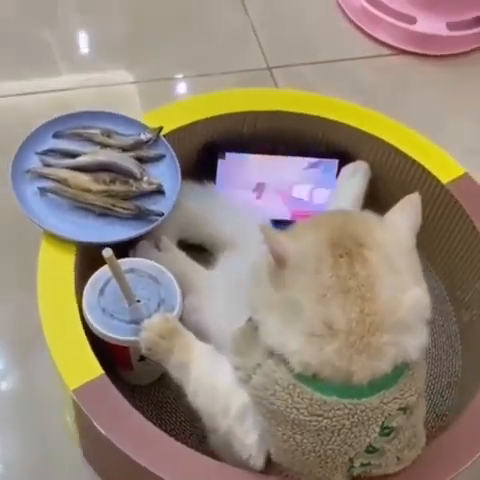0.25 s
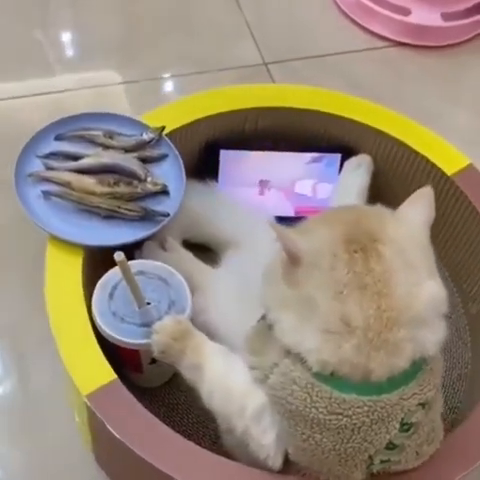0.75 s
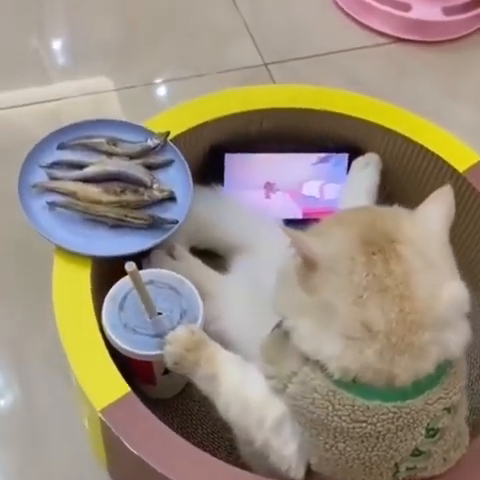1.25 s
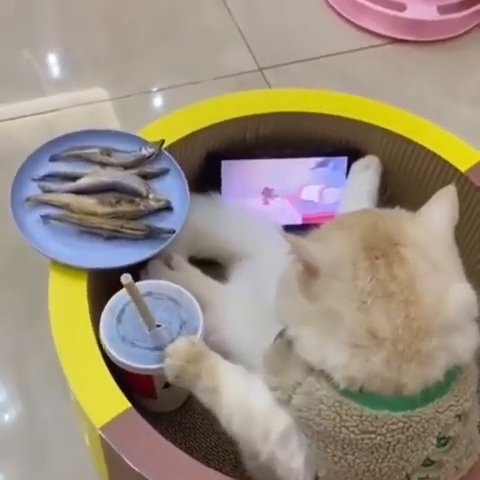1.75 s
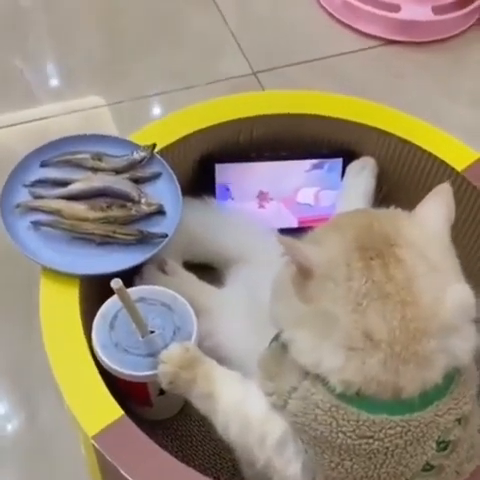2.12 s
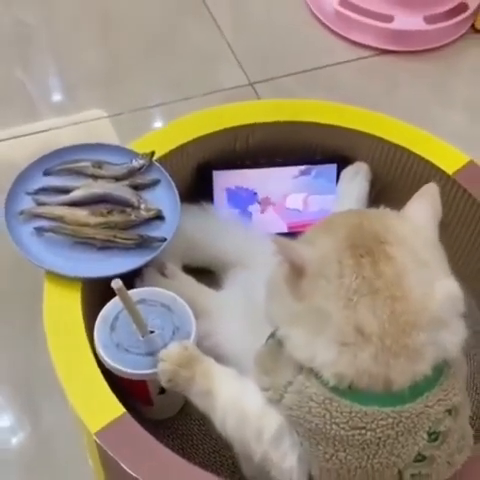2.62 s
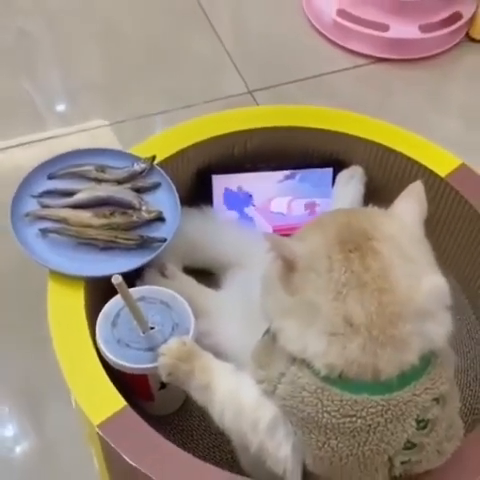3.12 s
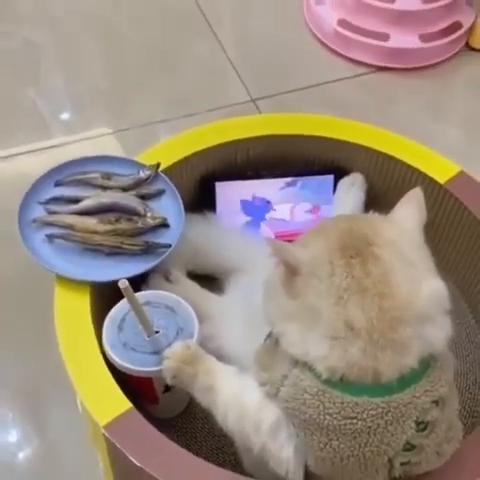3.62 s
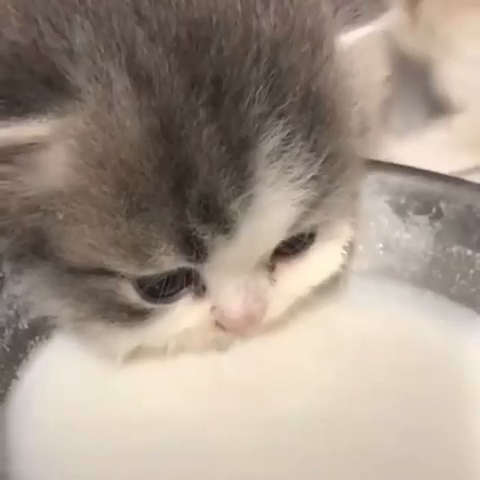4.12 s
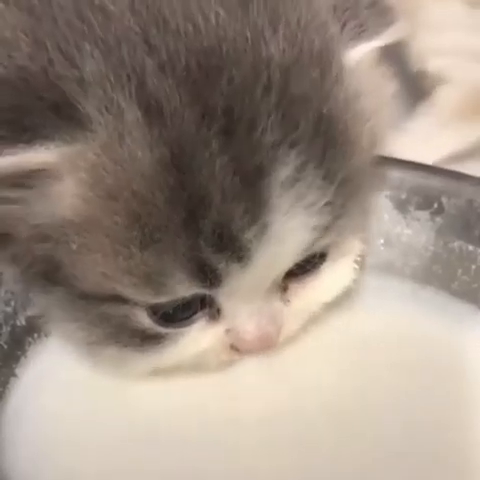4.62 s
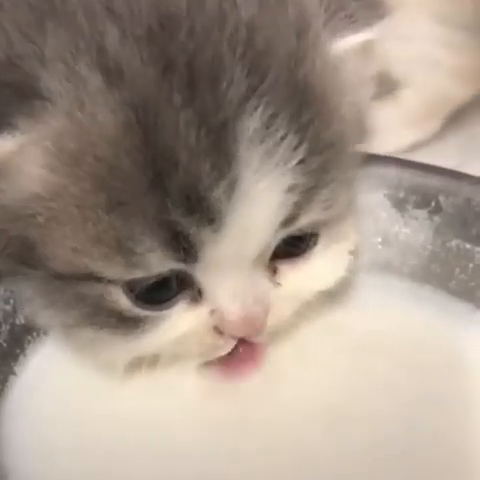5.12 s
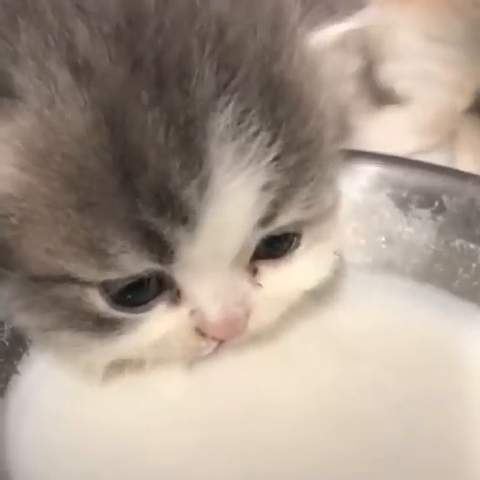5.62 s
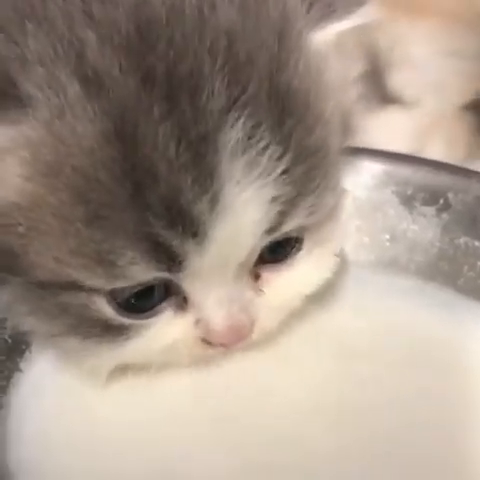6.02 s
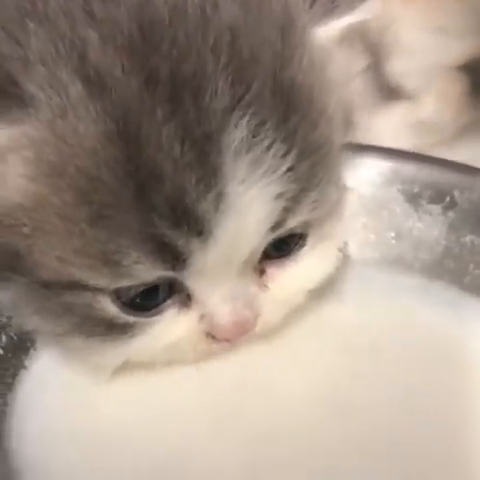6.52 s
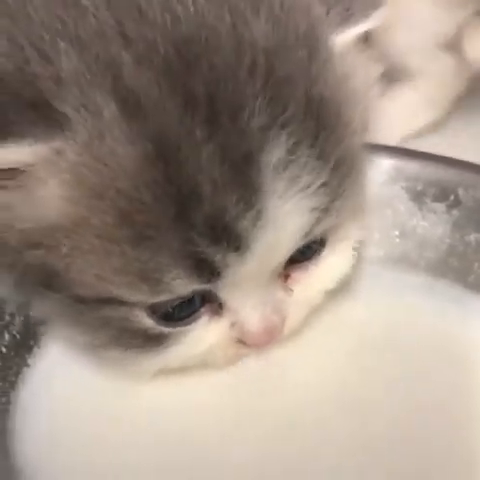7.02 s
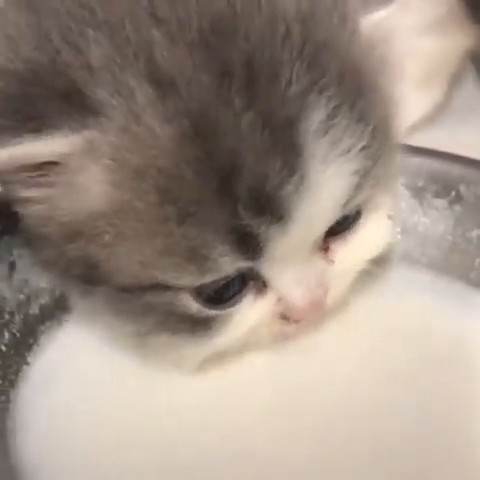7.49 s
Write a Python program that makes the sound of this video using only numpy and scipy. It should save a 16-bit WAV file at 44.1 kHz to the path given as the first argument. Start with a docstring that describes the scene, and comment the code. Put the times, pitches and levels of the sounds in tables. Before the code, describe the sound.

Near-silence with soft rustling for about five seconds, then loud, close, fast lapping of milk: sticky clicks, little gulps and bubbly chirps.

```python
"""Kitten lapping milk

Faint rustles in a quiet room; then, after a very short silence, a kitten laps milk close by from a metal bowl.
Each tongue stroke layers a wet crackle of tiny bubbles, gliding gulps, a run of snapping films and a low noise push.
Single pops stand out, longer bubbles chirp or linger, round plops ring at one pitch and the lips smack in noise.
Filtered noise and wavering sines make the rumble, hums and thin hiss below; one slurp of noise runs across the laps.
The quiet room is faint coloured noise and a far hum, with grainy bursts for the rustles and one dull bump."""
import sys
import numpy as np
from scipy import signal
from scipy.fft import rfft, irfft, next_fast_len
from scipy.io import wavfile
from scipy.ndimage import uniform_filter1d, minimum_filter1d

SR = 44100
rng = np.random.default_rng(int(sys.argv[2]) if len(sys.argv) > 2 else 0)


def dump(signal):
    """Clip the signal to [-1, 1] and save it as 16-bit WAV at the path in sys.argv[1]."""
    limited = np.clip(np.atleast_2d(signal).T, -1, 1)
    pcm = np.round(limited * 32767).astype(np.int16)
    wavfile.write(sys.argv[1], SR, pcm)


N = 341775
TIME = np.arange(N) / SR  # seconds


# Tongue strokes, shared by every layer of a lap.
# Each row: start in seconds, end in seconds, relative crackle level in dB, relative gulp level in dB.
STROKES = [(5.185, 5.206, -18.5, -28), (5.486, 5.503, -31, -33), (5.533, 5.547, -18.5, -31.5),
           (5.64, 5.656, -15, -19.5), (5.697, 5.716, -13.5, -22.5), (5.849, 5.862, -18, -31),
           (5.902, 5.94, -26.5, -36), (6.052, 6.062, -33, -24.5), (6.131, 6.163, -26, -29.5),
           (6.295, 6.318, -22, -29.5), (6.344, 6.388, -15, -31.5), (6.514, 6.562, -18.5, -33.5),
           (6.662, 6.694, -17.5, -30.5), (6.725, 6.746, -24, -20), (6.751, 6.785, -14.5, -31),
           (6.879, 6.921, -14.5, -17.5), (6.941, 6.976, -16, -23.5), (6.981, 7.021, -17.5, -38.5),
           (7.102, 7.14, -14.5, -18.5), (7.185, 7.235, -19.5, -23.5), (7.353, 7.39, -16, -19),
           (7.421, 7.452, -14.5, -30), (7.472, 7.505, -21, -36.5), (7.601, 7.656, -19.5, -27.5),
           (7.668, 7.747, -22.5, -39)]
# Colour of the crackle. Each row: frequency in Hz, relative density in dB.
CRACKLE_COLOUR = [(950, -16.5), (1250, -8.5), (2050, -5), (2850, -11.5), (3800, -2), (4700, -17.5),
                  (6500, -15)]


def crackle(release_s=0.004, fine_db=-6):
    """Tiny bubbles burst all along each stroke."""
    out = np.zeros(N)
    for start, end, wet_db, _ in STROKES:
        duration = end - start
        t = np.arange(0, duration + 10 * release_s, 1 / SR)
        attack = 1 - np.exp(-2 * t / release_s)
        fade = np.exp(-np.maximum(t - duration + release_s / 2, 0) / release_s)
        bursts = grains(len(t), per_s=1200, low_hz=1052, high_hz=6760, cycles=5.5, spread_db=10.5)
        fizz = unit(colour(bursts, CRACKLE_COLOUR))
        add(out, start, amp(wet_db + fine_db) * attack * fade * fizz)
    return out


def films(gap_s=0.0052, over_crackle_db=2, spread_db=5.5, spread_octaves=0.22,
          closing_octaves=0.21, cycles=2.9, arch_db=5):
    """The tongue peels off the milk in an uneven run of breaking films; each rings the closing mouth."""
    out = np.zeros(N)
    chances = rng.uniform(-1.003, 1, size=(len(STROKES), 30, 5))
    for (start, end, wet_db, gulp_db), run in zip(STROKES, chances):
        for k, (late, size, pitch, phase, bend) in enumerate(run):
            s = start + gap_s * (k + 0.5 + late / 2)
            if s < end:
                progress = (s - start) / (end - start)
                pull_db = arch_db * np.sin(np.pi * progress)  # the tongue pulls hardest in mid-stroke
                octaves = closing_octaves * (progress - 0.5) + spread_octaves * pitch
                hz = mouth_hz(wet_db, gulp_db) * 2 ** octaves
                db = wet_db + pull_db + over_crackle_db + spread_db * size
                add(out, *pop(s, db, hz, phase, bend, cycles))
    return out


def mouth_hz(wet_db, gulp_db, equal_hz=1542, octaves_per_db=0.022):
    """The deeper the tongue dips, the hollower the stroke: a louder gulp against the crackle lowers the pitch."""
    return equal_hz * 2 ** (octaves_per_db * (wet_db - gulp_db))


def gulps(hz=640, octaves=0.54, cycles=3.5, sag=0.08, gap_s=0.005, over_db=5.8):
    """The hollow under the tongue rings in low, falling glugs, deeper as the tongue lifts."""
    out = np.zeros(N)
    chances = rng.uniform(-1, 1, size=(len(STROKES), 30, 3))
    for (start, end, _, gulp_db), run in zip(STROKES, chances):
        for s, (late, pitch, phase) in zip(np.arange(start + gap_s, end, gap_s), run):
            lift = (s - start) / (end - start) - 0.5
            glug = blip(hz * 2 ** (octaves * (pitch - lift)), cycles, -sag, phase)
            add(out, *centred(s + late * gap_s / 2, amp(gulp_db + over_db) * glug))
    return out


# Single pops of milk that stand out. Each row: time in seconds, level in dB, pitch in Hz.
POPS = [(5.2434, -3.5, 1820), (5.2694, -7.5, 1750), (5.527, -11, 1450), (5.5348, -4, 3310),
        (5.6419, 1.5, 1490), (5.703, 2, 1900), (5.706, 0, 1557), (5.759, -5.5, 1800), (5.8309, -4, 1500),
        (5.852, -4.5, 1580), (5.8634, -10, 1530), (5.9326, -6.5, 1610), (6.0007, -16, 1660),
        (6.132, -7, 1950), (6.255, -6.5, 1950), (6.3314, -1.5, 2130), (6.3712, 2, 2050), (6.383, -4, 1437),
        (6.5303, -3, 1664), (6.5512, -3, 1570), (6.6697, -7, 1760), (6.7332, -3, 1555), (6.7489, 3, 2050),
        (6.763, 1, 1740), (6.817, -11.5, 1890), (6.88, -4, 1310), (6.904, -4.5, 1420), (6.947, -5.5, 1510),
        (7.108, -3.5, 1700), (7.1243, -0.5, 1630), (7.1945, -2, 1650), (7.2042, 0, 1510),
        (7.219, -0.5, 2000), (7.374, -2.5, 1285), (7.429, -4.5, 2120), (7.437, -1, 1720), (7.474, 4, 1600),
        (7.6823, -2.5, 3370), (7.693, 1.5, 3210)]


def pops(cycles=2.55, shred_db=-13, shred_s=0.006, shred_octaves=0.33):
    """Each single film tears with three weaker shreds scattered just before and after it."""
    out = np.zeros(N)
    chances = rng.uniform(-1, 1, size=(len(POPS), 4, 4))
    for (s, db, hz), (main, *shreds) in zip(POPS, chances):
        add(out, *pop(s, db, hz, *main[:2], cycles))
        for late, pitch, phase, bend in shreds:
            shred_hz = hz * 2 ** (shred_octaves * pitch)
            add(out, *pop(s + shred_s * late, db + shred_db, shred_hz, phase, bend, cycles))
    return out


def pop(s, db, hz, phase, bend, cycles, glide=0.1, overtone_db=-17, overtone_hz=3550):
    """A film snaps in a few cycles centred at s and touches the upper mouth resonance; gives (start, sound)."""
    life = cycles * (1 + bend ** 2 / 2)  # the longer pops glide further
    body = blip(hz, life, glide * bend, phase)
    overtone = amp(overtone_db) * blip(overtone_hz, life * overtone_hz / hz, glide * bend, bend)
    return centred(s, amp(db) * (body + overtone))


# Bubbles that ring on. Each row: start in seconds, level in dB, first pitch in Hz, last pitch in Hz.
BUBBLES = [(5.1874, -3, 1960, 2087), (5.188, -8, 4060, 4190), (5.537, -6.5, 2073, 1845),
           (6.14, -0.5, 2400, 2620), (6.1585, -8, 2500, 4000), (6.959, -3.5, 2066, 1630),
           (6.992, -3, 1900, 1520), (7.446, -7, 2390, 1945), (7.64, -5, 1642, 1560),
           (7.7019, -4, 2956, 3300), (7.733, -7, 1815, 1484)]


def bubbles(cycles=17.5, rough=0.35, waver=0.03, overtone_db=-24, edge_s=0.00053, sag_db=3,
            ring_db=-24, ring_s=0.031):
    """A pocket of air rings between tongue and milk, gliding as it changes size; its last pitch lingers."""
    out = np.zeros(N)
    t = TIME[:SR // 5] - 4 * edge_s  # leaves room for the soft onset
    for s, db, first_hz, last_hz in BUBBLES:
        length = 2 * cycles / (first_hz + last_hz)
        flutter = unit(uniform_filter1d(rng.standard_normal(len(t)), size=60))
        wobble = unit(uniform_filter1d(rng.standard_normal(len(t)), size=60))
        hz = np.interp(t, [0, length], [first_hz, last_hz]) * (1 + waver * wobble)
        phase = 2 * np.pi * (np.cumsum(hz) / SR + rng.random())
        onset = (1 + np.tanh(t / edge_s)) / 2
        held = (1 - np.tanh((t - length) / (2 * edge_s))) / 2 * amp(-sag_db * t / length)
        lingering = amp(ring_db + db) * np.exp(-t / ring_s)  # level counts twice: strong bubbles linger most
        shape = amp(db) * onset * (held + lingering) * (1 + rough * flutter)
        add(out, s + t[0], shape * (np.sin(phase) + amp(overtone_db) * np.sin(2 * phase)))
    return out


# Round plops as the tongue dips in. Each row: time in seconds, level in dB, pitch in Hz.
PLOPS = [(5.368, -18, 1290), (5.3805, -10, 1303), (5.482, -17, 1270), (5.491, -9.5, 1284),
         (6.23, -24, 1160), (6.4718, -9.5, 1302), (7.252, -8.5, 1540), (7.265, -7.5, 1480)]


def plops(cycles=5.2, rise=0.034, snap_db=-5, snap_cycles=1.3, snap_ratio=1.35):
    """A larger pocket of air closes with a small wet snap and rings briefly, rising a little."""
    out = np.zeros(N)
    for (s, db, hz), (phase, snap_phase, bend) in zip(PLOPS, rng.random((len(PLOPS), 3))):
        add(out, *centred(s, amp(db) * blip(hz, cycles, rise, phase)))
        add(out, *pop(s - 1 / hz, db + snap_db, hz * snap_ratio, snap_phase, bend, snap_cycles))
    return out


# Sharp smacks of the lips. Each row: time in seconds, level in dB.
SMACKS = [(5.243, -20.5), (5.3774, -23), (5.543, -22), (5.7133, -14), (5.932, -7.5), (7.444, -17.5)]
# Colour of the smacks. Each row: frequency in Hz, relative density in dB.
SMACK_COLOUR = [(1000, -14.5), (3700, -5), (4800, -16.5), (6600, 0), (7600, -15.5)]


def smacks(width_s=0.0018):
    """Very short bright bursts of noise as the lips part."""
    bursts = sum(amp(db) * swell(s, width_s) for s, db in SMACKS)
    return bursts * noise(SMACK_COLOUR)


# Milk sucked through the lips. Each row: time in seconds, level in dB.
SLURP = [(6.9, -42), (6.97, -25), (7.05, -21.5), (7.11, -28), (7.2, -42)]


def wet_mouth(under_crackle_db=-19, linger_s=0.036):
    """Tiny droplets burst around the end of each stroke; the slurp fizzes as patchy noise."""
    bursts = grains(N, per_s=400, low_hz=930, high_hz=3600, cycles=6, spread_db=9)
    droplets = unit(colour(bursts, CRACKLE_COLOUR))
    wetness = sum(amp(wet_db + under_crackle_db) * swell(end, linger_s, steep=1) for _, end, wet_db, _ in STROKES)
    return wetness * droplets + level(SLURP) * patchy(noise(HISS_COLOUR), depth_db=6)


# Colour of the low push. Each row: frequency in Hz, relative density in dB.
PUSH_COLOUR = [(30, -8), (65, 3), (300, 2), (900, -28.5)]


def pushes(push_db=-19, width_s=0.045, lag_s=0.015):
    """Every stroke gives a soft low push of noise that grows, in dB, half as much as its gulp."""
    strength = sum(amp(push_db + gulp_db / 2) * swell(start + lag_s, width_s, steep=2.8)
                   for start, _, _, gulp_db in STROKES)
    return strength * noise(PUSH_COLOUR)


# Modes of the metal bowl, damped by the milk. Each row: frequency in Hz, relative level in dB.
BOWL = [(795, -25), (2540, -32)]


def bowl(x, t60=0.16):
    """Each click sets the bowl ringing faintly, as decaying sines convolved with the sound."""
    t = TIME[:SR // 2]
    ring = sum(amp(db - 60 * t / t60) * np.sin(2 * np.pi * hz * t) for hz, db in BOWL)
    return signal.fftconvolve(x, ring / 20)[:N]


def at_the_bowl(from_s=5.18, edge_hz=7500, room_db=-18, width_db=-34, bright_width_db=-10):
    """The lapping with the ring of the bowl and the room behind it, nearly mono and without top treble."""
    laps = pops() + plops() + gulps() + films() + bubbles() + crackle() + smacks() + wet_mouth()
    laps = laps + bowl(laps)
    laps = laps + amp(room_db) * reflections(laps, t60=0.22)[0]
    fade_in = np.clip((TIME - from_s) / 0.0017, 0, 1) ** 2
    near = (laps + pushes() + near_floor()) * fade_in
    # the ears differ mostly in the treble, which the gradient brings out
    spread = amp(width_db) * near + amp(bright_width_db) * np.gradient(near)
    side = reflections(spread, t60=0.0032)[0]
    return limit(low_pass(np.array([near + side, near - side]), edge_hz))


# Colours of the rumble and the hiss near the bowl. Each row: frequency in Hz, relative density in dB.
RUMBLE_COLOUR = [(20, -33), (48, -3.5), (220, -9.5), (900, -26), (2000, -71)]
HISS_COLOUR = [(900, -6), (1500, 3.5), (2900, -9), (3700, -6.5), (4700, -13.5), (6700, -4.5), (7600, -34.5)]
# Hiss round the bowl. Each row: time in seconds, level in dB.
HISS_LEVEL = [(5.2, -39), (5.32, -55.5), (6.05, -49.5), (6.42, -35.5), (7.56, -53), (7.7, -40)]
# Swells of a low, unsteady hum. Each row: time in seconds, level in dB, width in seconds, pitch in Hz.
HUM_SWELLS = [(6.165, -22, 0.05, 194), (6.158, -22, 0.019, 315), (6.148, -22, 0.021, 388),
              (7.16, -18, .08, 191), (7.35, -26, 0.12, 204)]
# Mains hum near the bowl. Each row: frequency in Hz, level in dB.
MAINS = [(50, -39.5), (100, -38.5)]


def near_floor(rumble_db=-34.5, flutter_db=2.8):
    """Noise rumble, swelling and steady hums and a wavering noise hiss round the bowl."""
    hiss = level(HISS_LEVEL) * amp(flutter_db * drift(size=900)) * patchy(noise(HISS_COLOUR), depth_db=7)
    swelling = sum(amp(db) * swell(s, width) * hum(hz, waver_hz=5) for s, db, width, hz in HUM_SWELLS)
    swelling = swelling * amp(2.6 * drift(size=1200))
    mains = sum(amp(db) * hum(hz, waver_hz=1.58) for hz, db in MAINS)
    rumble = amp(rumble_db) * patchy(noise(RUMBLE_COLOUR), depth_db=3.5)
    return rumble + hiss + swelling + mains


def hum(hz, waver_hz):
    """A low sine whose pitch wanders slightly."""
    return np.sin(2 * np.pi * np.cumsum(hz + waver_hz * drift(size=1500)) / SR)


# Rustles in the quiet room. Each row: time in seconds, level in dB.
RUSTLES = [(0.411, -59.5), (0.546, -60.5), (0.86, -63), (0.983, -56), (1.123, -55), (1.15, -43),
           (1.26, -63), (1.72, -53), (1.83, -63), (1.96, -51.5), (2.306, -62.5), (2.71, -62), (2.751, -49),
           (2.783, -45), (3.65, -68), (3.77, -67), (3.938, -59.5), (4.108, -66), (4.25, -68.5), (4.92, -69)]
# Colour of the rustles. Each row: frequency in Hz, relative density in dB.
RUSTLE_COLOUR = [(400, -32), (850, 4), (5800, -0.5), (10500, -17.5), (13000, -24)]


def rustles(brisk_s=0.014, brisk_db=-38, doubling_db=15, grain_db=2.5, stir_db=-83, tail_db=-15, tail_s=0.072):
    """Grainy brushes of cloth start briskly and settle softly over a faint stirring; softer ones are slower."""
    brushes = np.zeros(N)
    for s, db in RUSTLES:
        width = brisk_s * 2 ** ((brisk_db - db) / doubling_db)
        brushes += amp(db) * (swell(s, width, steep=6.8) + amp(tail_db) * swell(s, tail_s, steep=20))
    stir = amp(stir_db + 3.5 * drift(size=5000))
    cloth = patchy(amp(grain_db * drift(size=150)) * noise(RUSTLE_COLOUR), depth_db=4)
    return (brushes + stir) * cloth


# Colour of the dull bump. Each row: frequency in Hz, relative density in dB.
THUD_COLOUR = [(20, -7), (45, 2), (850, -8), (1500, -50)]


def bump(s=1.55, thud_db=-49, boom_db=-52, boom_s=0.47):
    """One dull bump of noise, and the low boom that it leaves in the room."""
    since = np.maximum(TIME - s, 0)
    boom_shape = (1 - np.exp(-since / 0.008)) * np.exp(-since / boom_s)
    boom = amp(boom_db) * boom_shape * noise(QUIET_RUMBLE_COLOUR)
    return amp(thud_db) * swell(s, width=0.046) * noise(THUD_COLOUR) + boom


# Colours of the rumble and air in the quiet room. Each row: frequency in Hz, relative density in dB.
QUIET_RUMBLE_COLOUR = [(20, -27), (65, 9.5), (130, -16.5), (260, -6.5), (340, -27), (800, -67)]
QUIET_AIR_COLOUR = [(600, -3), (820, 2.5), (1100, -4.5), (2200, -6), (3300, -17), (7000, -24.5)]
# Air, rumble and faint far hum in the quiet room. Each row: time in seconds, level in dB.
AIR_LEVEL = [(0, -69), (1.5, -64), (3.9, -65.5), (4.6, -73), (5.1, -68)]
QUIET_RUMBLE_LEVEL = [(0, -80.5), (1.4, -68), (2.7, -60), (5.1, -66.5)]
FAR_HUM_LEVEL = [(1.4, -77), (1.6, -54.5), (2.2, -80), (4.0, -79), (4.4, -64.5), (5.1, -76.5)]


def quiet_room(until_s=5.115, edge_hz=11800, far_hum_hz=255, wet_db=-11, side_db=-4):
    """Faint noise air, rumble and a sine hum, with soft rustles and one dull bump, a little to the left."""
    rustle = rustles()
    shared_air = patchy(noise(QUIET_AIR_COLOUR), depth_db=1.5)
    side_air = amp(side_db) * np.array([noise(QUIET_AIR_COLOUR), noise(QUIET_AIR_COLOUR)])
    air = level(AIR_LEVEL) * (shared_air + side_air)
    rumble = level(QUIET_RUMBLE_LEVEL) * noise(QUIET_RUMBLE_COLOUR)
    far_hum = level(FAR_HUM_LEVEL) * hum(far_hum_hz, waver_hz=2.26)
    tail = amp(wet_db) * reflections(rustle, t60=0.54)
    left, right = rustle + tail + air + rumble + far_hum + bump()
    room = np.array([left, np.roll(right, 1)])  # the right ear hears it one sample later
    return low_pass(room, edge_hz) * np.clip((until_s - TIME) / 0.038, 0, 1)


def blip(hz, cycles, glide, phase):
    """A few gliding cycles under a bell-shaped swell, centred in its own length."""
    u = np.arange(-np.pi, np.pi, np.pi * hz / (cycles * SR))
    bell = np.exp(-u ** 2 / 2) - np.exp(-np.pi ** 2 / 2)  # reaches zero at both ends
    return bell * np.sin(2 * cycles * (u + glide * u ** 2 / 2) + 2 * np.pi * phase)


def grains(size, per_s, low_hz, high_hz, cycles, spread_db):
    """A random run of tiny bubbles, each with its own pitch, length and glide."""
    out = np.zeros(size)
    count = int(per_s * size / SR) + 1
    for when, pitch, life, bend, phase, height in rng.random((count, 6)):
        hz = low_hz * (high_hz / low_hz) ** pitch
        sound = blip(hz, cycles * 2 ** (2 * life - 1), (bend - 0.5) / 10, phase)
        add(out, *centred(when * size / SR, amp(spread_db * height) * sound))
    return out


def centred(s, sound):
    """Gives (start, sound) with the middle of the sound at s."""
    return s - len(sound) / SR / 2, sound


def add(mix, s, sound):
    """Adds a sound into the mix from time s."""
    part = mix[max(round(s * SR), 0):][:len(sound)]
    part += sound[:len(part)]


def swell(s, width, steep=2):
    """A cusp in time that peaks at 1 at s; the rise is steep times as fast as the fall."""
    distance = np.maximum(TIME - s, steep * (s - TIME))
    return np.exp(-np.minimum(distance / width, 20))


def level(rows):
    """Gain over time from a curve of (s, dB)."""
    return amp(np.interp(TIME, *np.transpose(rows)))


def amp(db):
    """Decibels to gain."""
    return 10 ** (np.asarray(db) / 20)


def unit(x):
    """Scales to rms 1."""
    return x / np.sqrt(np.mean(x ** 2) + 1e-20)


def drift(size):
    """Random wander of rms 1, smoothed over size samples."""
    return unit(uniform_filter1d(rng.standard_normal(N), size=size))


def noise(points):
    """Steady coloured noise of rms 1."""
    return unit(colour(rng.standard_normal(N), points))


def colour(x, points):
    """Filters by a spectrum drawn over log frequency, scaled to unit power gain."""
    hz, db = np.transpose(points)
    size = next_fast_len(len(x) + 2048)
    bins_hz = np.fft.rfftfreq(size, 1 / SR)
    gain = amp(np.interp(np.log(bins_hz + 1), np.log(hz), db))
    return irfft(rfft(x, size) * unit(gain), size)[:len(x)]


def patchy(x, depth_db):
    """Makes a noise uneven with random patches in time and frequency; rms 1."""
    z = signal.stft(x, nperseg=512)[2]
    field = uniform_filter1d(rng.standard_normal(z.shape), size=9, axis=0)
    field = unit(uniform_filter1d(field, size=8, axis=1))
    return unit(signal.istft(z * amp(depth_db * field), nperseg=512)[1][:N])


def reflections(x, t60):
    """Two independent diffuse tails of decaying noise, one a channel."""
    t = TIME[:SR // 2]
    tails = rng.standard_normal((2, len(t))) * amp(-60 * t / t60) * (1 - np.exp(-t / 0.003))
    return signal.fftconvolve(x[None], tails / np.linalg.norm(tails[0]), axes=1)[:, :N]


def low_pass(x, hz):
    """Steep band limit on both channels."""
    taps = signal.firwin(301, hz, window=("kaiser", 8), fs=SR)
    return signal.oaconvolve(x, taps[None], "same")


def limit(x, ceiling=0.93):
    """A fast limiter turns the loudest pops down to the ceiling, both channels together."""
    gain = ceiling / np.maximum(abs(x).max(0), ceiling)
    return x * uniform_filter1d(minimum_filter1d(gain, size=60), size=60)


def scene():
    """First the quiet room, then the kitten."""
    return quiet_room() + at_the_bowl()


def record(dry, edge_hz=15700):
    """A steep overall limit to the treble."""
    return low_pass(dry, edge_hz)


dry = scene()
out = record(dry)
dump(out)
```